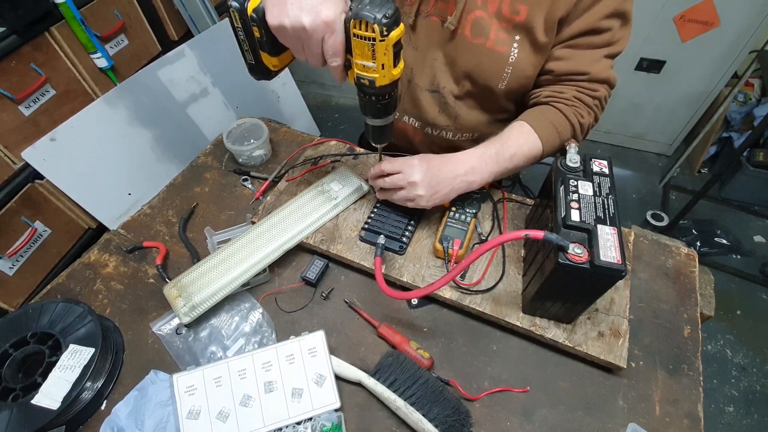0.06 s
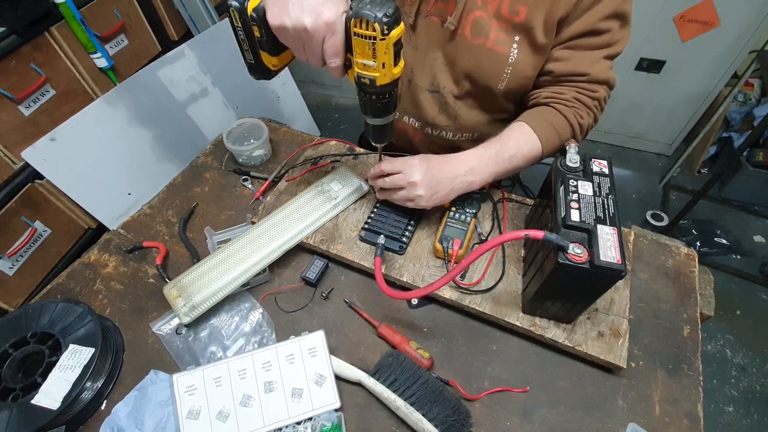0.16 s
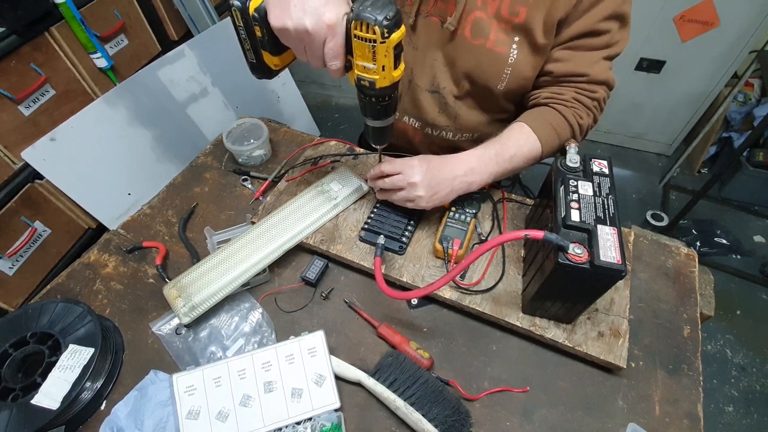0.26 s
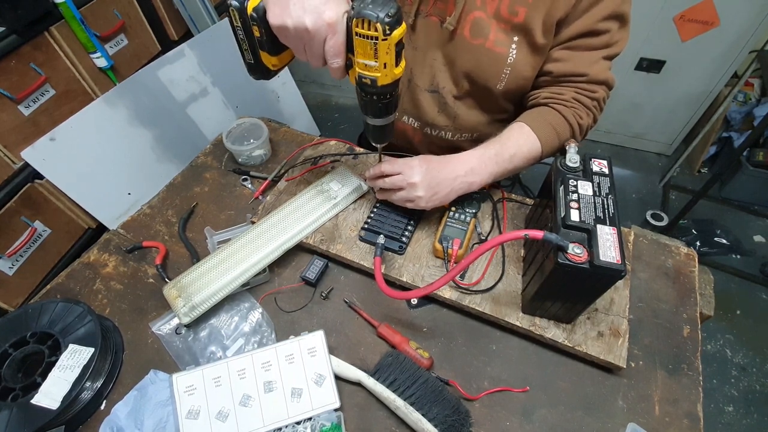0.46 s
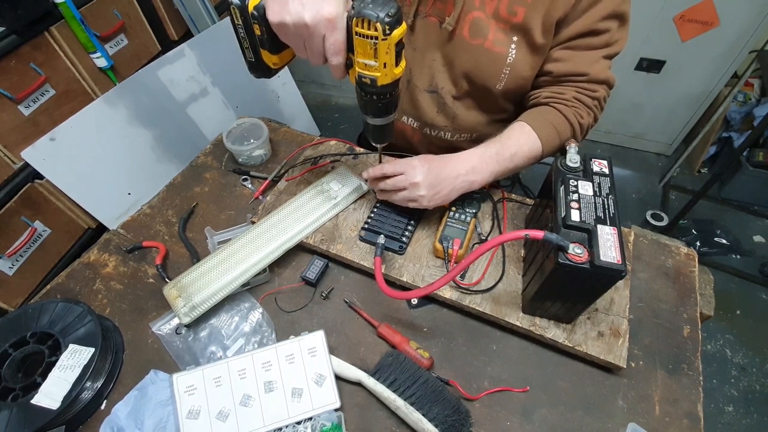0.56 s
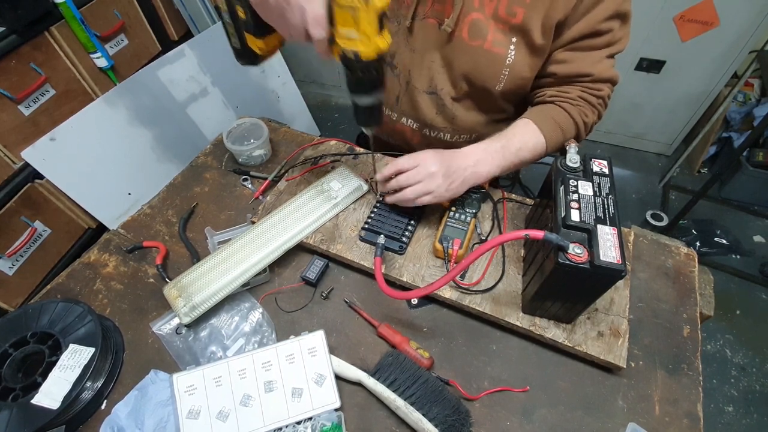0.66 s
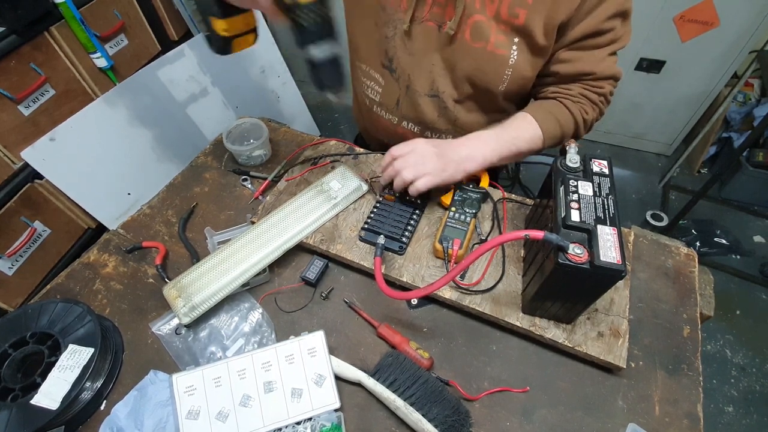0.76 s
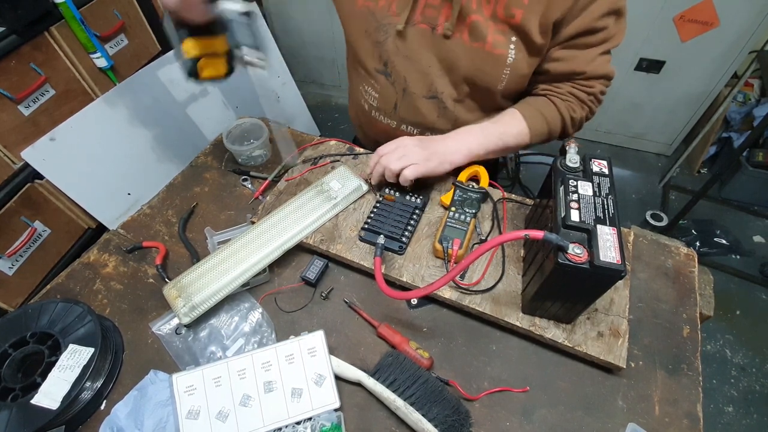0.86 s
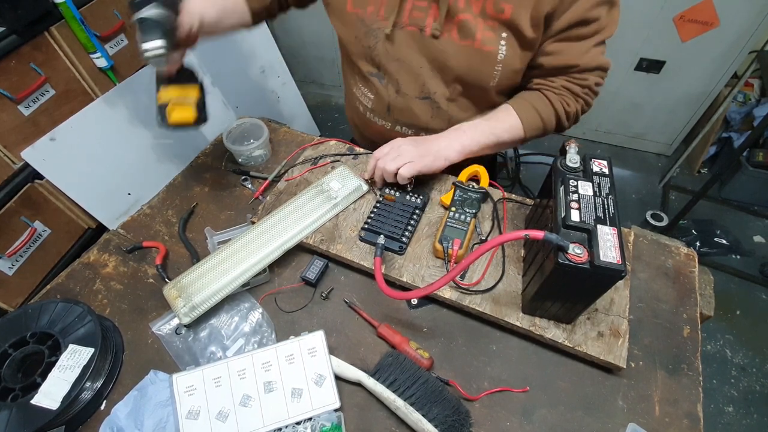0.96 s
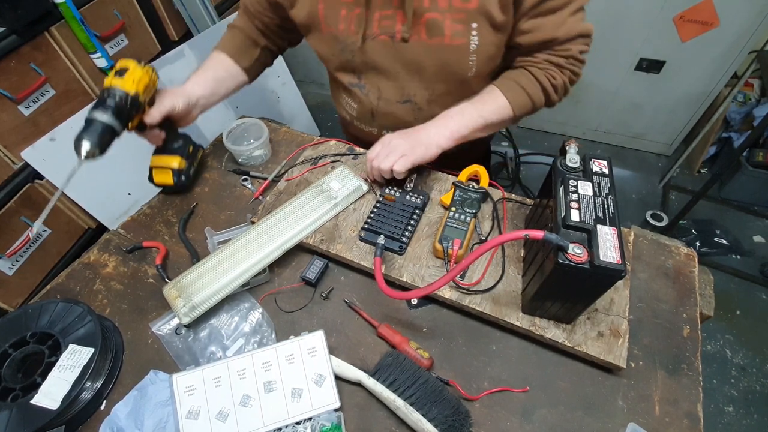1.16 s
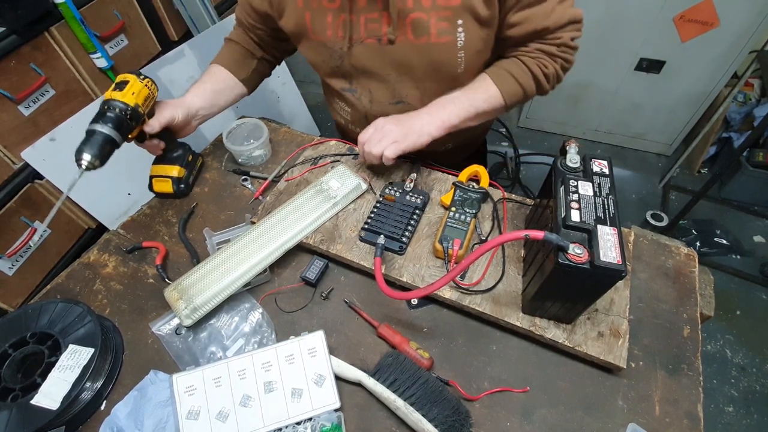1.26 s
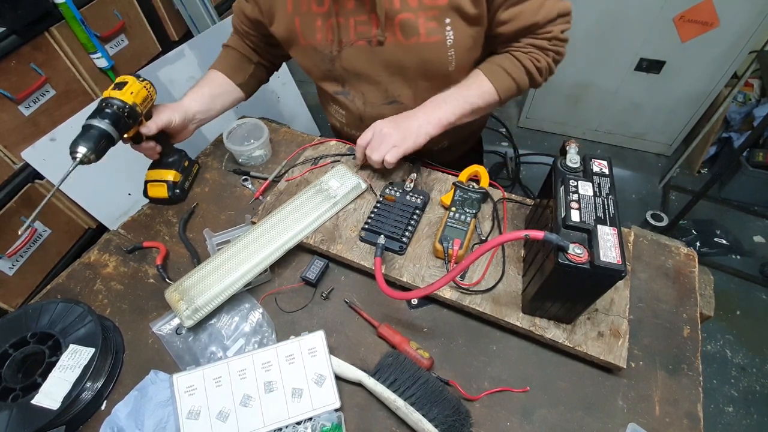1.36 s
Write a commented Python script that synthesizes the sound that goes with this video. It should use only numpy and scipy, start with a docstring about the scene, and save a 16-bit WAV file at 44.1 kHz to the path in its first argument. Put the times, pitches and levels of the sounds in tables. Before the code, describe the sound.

A cordless drill runs in one brief burst, driving a screw, with a few knocks.

```python
"""A small workshop, where a cordless drill drives a screw into a board on a workbench.
The bit knocks into place; the motor runs for a fifth of a second, its gear teeth exciting the housing.
The bit jumps in the screw head, the drive stops with a clack, and one more knock follows.
Each blow sets the bench's low modes ringing. Plastic ticks and a sleeve rustles as the drill is
lifted away. All of it reaches the listener directly, by early reflections and as reverberation."""
import sys
import numpy as np
from scipy import signal
from scipy.fft import rfft, irfft, next_fast_len
from scipy.io import wavfile
from scipy.ndimage import map_coordinates

SR = 44100
rng = np.random.default_rng(int(sys.argv[2]) if len(sys.argv) > 2 else 0)


def master_out(mix):
    """Clip the mix to full scale and print it as 16-bit PCM to the path in sys.argv[1]."""
    frames = np.transpose(np.atleast_2d(mix))
    ceiling = np.clip(frames, -1, 1)
    pcm = np.round(ceiling * 32767).astype(np.int16)
    wavfile.write(sys.argv[1], SR, pcm)


N = 61739

# Levels and gains in the tables are relative.
# Motor shaft rotation: time_s, speed_hz
SHAFT_SPEED = [(.385, 229.7), (.408, 305.2), (.44, 318.2), (.475, 326.4), (.51, 348.8), (.545, 356),
               (.57, 368), (.6, 361.3), (.65, 278.4)]
# Loudness of the gears under load: time_s, level_db
GEAR_LOAD = [(.385, -77), (.394, -58), (.406, -37.5), (.43, -27), (.465, -23), (.555, -24), (.58, -26.5),
             (.59, -31), (.604, -24), (.618, -50.5), (.66, -78.5)]
# Response of gearbox and housing: frequency_hz, gain_db
HOUSING_RESPONSE = [(60, -13.5), (200, -18), (600, -18), (1200, -13.5), (1900, -11), (2500, -4.5),
                    (3100, -4.5), (4200, -5), (5900, -6.5), (7800, -13), (9500, -8.5), (11500, -15.5),
                    (15000, -18.5)]
# Motor harmonics: shaft_multiple, level_db
WHINE_HARMONICS = [(4, -23), (8, -16), (9, -8), (10, -17), (18, -23), (27, -21)]
# Blows of bit and drill on the work:
# start_s, thump_db, low_db, body_db, mid_db, high_db, treble_db, clatter_t60_s
BLOWS = [(.001, -35, -18, -13.5, -24.5, -38, -56.5, 0.086), (.028, -33, -17, -10.5, -18, -30, -52, 0.052),
         (.227, -67, -27, -13.5, -20, -23.5, -38.5, .05), (.233, -22.5, -13.5, -11, -19, -36, -48, 0.28),
         (.395, -80, -43, -33, -22, -34, -45.5, .02), (.428, -18, 6, -0.5, -12, -8.5, -27.5, 0.093),
         (.445, -28.5, -2, -6, -14, -12.5, -26, 0.046), (.565, -43.5, -16.5, -8.5, -5.5, -5, -16.5, 0.079),
         (.596, -37.5, -6, 2, -5, -6, -17, 0.027), (.766, -37, -14, -12, -8.5, -16.5, -30.5, 0.031)]
# Where a blow's five levels, low to treble, apply: frequency_hz
BLOW_BANDS = [300, 550, 1200, 3000, 9000]
# Modes of bench and board: pitch_hz, level_db, t60_s
BENCH_MODES = [(49, -7.5, .36), (66.2, -10, 0.27), (77.8, -4, 0.16), (94.5, -5, 0.13), (140.7, -3, 0.13),
               (229, -11, 0.14), (321.8, -14, 0.14)]
# Soft leaning on the bench: start_s, level_db
BENCH_NUDGES = [(0.185, -36.5), (0.789, -45.5), (1.335, -47), (1.373, -39.5)]
# Spectrum of the bench shaken by the turning bit: frequency_hz, gain_db
HUM_SPECTRUM = [(30, -14), (58, -2), (100, -5), (140, 6), (230, -4), (330, -12), (450, -18), (1000, -45)]
# Light contacts on the lifted drill: start_s, level_db, ring_db, treble_db, t60_s
SHELL_CONTACTS = [(.943, -55.5, -71, 1.5, 0.023), (1.014, -65.5, -56.5, -4, 0.018),
                  (1.09, -60, -57.5, -18, .015), (1.133, -55, -55, -22.5, .07), (1.248, -44, -48, 3, 0.071),
                  (1.294, -48.5, -54, -10, .05), (1.341, -40.5, -67, 3, 0.049),
                  (1.357, -50.5, -76, 11.5, 0.055), (1.391, -34, -48, -7, 0.033)]
# Spectrum of a contact below its treble: frequency_hz, gain_db
TICK_SPECTRUM = [(100, -12), (400, -7), (750, 2), (2000, -3), (3500, 2)]
# Modes of the drill's shell: pitch_hz, level_db, t60_s
SHELL_MODES = [(752, -19, 0.041), (1206, 0, 0.035), (2660, -17.5, .04), (3500, 0.5, 0.022)]
# Thin, fuzzy ring of the moving drill: time_s, pitch_hz, level_db
SHIMMER_PATH = [(1.005, 1190, -98), (1.017, 1210, -64), (1.05, 1230, -79.5), (1.14, 1290, -65),
                (1.169, 1300, -72.5), (1.249, 1370, -69.5), (1.4, 1400, -73.5)]
# Rubbing of sleeve and hand: time_s, level_db
RUSTLE_ENVELOPE = [(0, -101), (.215, -87), (.245, -50.5), (.29, -62), (.35, -66.5), (.385, -68.5),
                   (.87, -76.5), (1.0, -69), (1.15, -72), (1.22, -75), (1.32, -61.5), (1.4, -57)]
# Spectrum of that rubbing: frequency_hz, gain_db
CLOTH_SPECTRUM = [(60, -7), (300, -13.5), (750, -2), (950, -10), (1350, -3.5), (1900, -6), (3300, -3),
                  (6000, -18), (8500, -19), (15000, -28.5)]
# Response of the straight path: frequency_hz, gain_db
DIRECT_RESPONSE = [(100, -1), (1200, 2), (3000, -0.5), (9000, -9)]
# Response of the echoes off the cluttered bench: frequency_hz, gain_db
EARLY_RESPONSE = [(60, -43), (250, -5.5), (1000, -2.5), (3000, -1.5), (10000, 0)]
# Reverberation time of the workshop: frequency_hz, t60_s
ROOM_DECAY = [(100, 0.4745), (500, 0.29), (1500, 0.27), (3000, 0.44), (6000, 0.2877), (12000, 0.19)]
# Response of the reverberant tail: frequency_hz, gain_db
TAIL_RESPONSE = [(50, -11.5), (150, -8), (300, -7), (500, -2.5), (1000, -5), (1700, -3.5), (3200, -10),
                 (6000, -8), (12000, -6)]
# Stereo balance: frequency_hz, left_over_right_db
BALANCE = [(100, 0), (600, 1.5), (1300, 1.5), (2400, 1.5), (4400, 4.5), (8000, 2.5), (14000, -0.5)]
# Width of the diffuse field: frequency_hz, side_over_mid_db
FIELD_WIDTH = [(80, -17), (200, -12.5), (450, -8), (1200, 0)]
# Spectrum of the quiet air: frequency_hz, gain_db
AIR_SPECTRUM = [(20, -16.5), (70, 2.5), (150, -13.5), (500, -8), (1500, -22.5), (4000, -27.5), (8000, -44),
                (15000, -49.5)]


def drill(pulses_per_turn=9, carrier_ratio=.26, speed_jitter=.004, flutter_db=3, wander_rad=.9):
    """Forced vibration: sharp pulses nine times a shaft turn and gear and brush friction drive the housing; the
    motor whines."""
    turns = np.cumsum(curve(SHAFT_SPEED) * (1 + speed_jitter * wobble(150))) / SR
    angle = 2 * np.pi * turns
    strikes = np.diff(np.floor(pulses_per_turn * turns), prepend=0)
    strikes *= 1 + 1.98 * rng.standard_normal(N)  # the pulses come unevenly
    # Gear noise swells with the planet carrier and twice a shaft turn.
    swell = (1 + .36 * np.sin(carrier_ratio * angle)) * (1 + .13 * np.sin(2 * angle))
    mesh = amp(-7.5) * swell * unit(coloured(strikes - strikes.mean(), HOUSING_RESPONSE))
    grind = amp(-1.5) * swell * noise(HOUSING_RESPONSE)
    whine = np.zeros(N)
    for multiple, db in WHINE_HARMONICS:
        strength = amp(db + flutter_db * wobble(200))
        whine += strength * np.sin(multiple * angle + wander_rad * wobble(120))
    return amp(curve(GEAR_LOAD)) * np.array([mesh, grind, whine])


def motor_squeal(start_s=.3895, pitch_hz=3950, level_db=-41, t60_s=.12):
    """Starting transient: one damped tone as the trigger first feeds the motor."""
    out = np.zeros(N)
    add(out, start_s, ring([(pitch_hz, level_db, t60_s)]))
    return out


def knocks(crack_t60_s=.004, clatter_db=5.5):
    """Impact excitation: each brief contact gives a broadband crack and a short clatter."""
    out = np.zeros(N)
    for start_s, _, *bands_db, t60_s in BLOWS:
        spectrum = [(60, bands_db[0] - 6), *zip(BLOW_BANDS, bands_db), (15000, bands_db[-1] - 10)]
        crack = .72 * signal.unit_impulse(N) + .7 * burst(crack_t60_s)
        clatter = amp(clatter_db) * burst(t60_s)
        add(out, start_s, amp(8.5) * coloured(crack + clatter, spectrum))
    return out


def bit_slip(start_s=.5646, level_db=-10.5, pitch_hz=1160, rise_s=.00064):
    """Heavy damping: the board gives one hard pop as the bit jumps in the screw head."""
    out, t = np.zeros(N), np.arange(N) / SR
    envelope = (t / rise_s * np.exp(1 - t / rise_s)) ** 2
    add(out, start_s, amp(level_db) * envelope * np.sin(2 * np.pi * pitch_hz * t))
    return out


def bench(blow_rise_s=.0021, nudge_rise_s=.012, hum_db=-16.5):
    """Free and forced vibration: the bench rings after blows and nudges, and hums as the bit turns."""
    out, t = np.zeros(N), np.arange(N) / SR
    for events, rise_s in (BLOWS, blow_rise_s), (BENCH_NUDGES, nudge_rise_s):
        for start_s, db, *_ in events:
            add(out, start_s, amp(db) * ring(BENCH_MODES) * (1 - np.exp(-t / rise_s)))
    hum = amp(curve(GEAR_LOAD) + hum_db) * noise(HUM_SPECTRUM)
    return out + hum


def ticks(click_gain_db=20.5):
    """Modal resonance: light plastic contacts click and ring the drill's shell."""
    out = np.zeros(N)
    for start_s, db, ring_db, treble_db, t60_s in SHELL_CONTACTS:
        spectrum = [*TICK_SPECTRUM, (6500, treble_db), (15000, treble_db - 23.5)]
        click = amp(db + click_gain_db) * coloured(burst(t60_s), spectrum)
        add(out, start_s, click + amp(ring_db) * ring(SHELL_MODES))
    return out


def shimmer(modulation_hz=150):
    """Random modulation: a tone spreads into a narrow band, rising as the drill swings away."""
    time_s, pitch_hz, db = np.transpose(SHIMMER_PATH)
    phase = 2 * np.pi * np.cumsum(curve(np.c_[time_s, pitch_hz])) / SR
    band = wobble(modulation_hz) * np.cos(phase) + wobble(modulation_hz) * np.sin(phase)
    return amp(curve(np.c_[time_s, db])) * band


def rustle(flutter_db=3.5):
    """Friction noise: sleeve and hand brush along unevenly."""
    return amp(curve(RUSTLE_ENVELOPE) + flutter_db * wobble(90)) * noise(CLOTH_SPECTRUM)


def workshop(source, early_db, tail_db, early_t60_s=.049, left_lead_s=.00005):
    """Multipath propagation: direct sound from slightly left, bench echoes and a reverberant tail."""
    hz, t, spectrogram = signal.stft(diffuse(), SR, nperseg=256)
    decay = np.exp(-np.log(1000) * t / along(ROOM_DECAY, hz)[:, None])
    tail = signal.istft(spectrogram * decay, SR, nperseg=256)[1][:, :N]
    tail *= 1 - fade(.022)  # reverberation takes a moment to build
    tail = amp(tail_db) * coloured(tail / np.linalg.norm(tail[0]), TAIL_RESPONSE)
    early = diffuse() * fade(early_t60_s)
    early = amp(early_db) * coloured(early / np.linalg.norm(early[0]), EARLY_RESPONSE)
    side = np.array([[.5], [-.5]])
    lead_s = side * left_lead_s
    direct = filtered(source, lambda f: amp(along(DIRECT_RESPONSE, f)) * np.exp(2j * np.pi * f * lead_s))
    reflected = signal.fftconvolve(source[None], early + tail, axes=1)[:, :N]
    return filtered(direct + reflected, lambda f: amp(side * along(BALANCE, f)))


def room_air(level_db=-79):
    """Ambient noise: a steady diffuse field, strongest in the bass."""
    return amp(level_db) * unit(coloured(diffuse(), AIR_SPECTRUM))


def diffuse():
    """Spatial coherence: stereo noise, alike in the bass and unrelated in the treble."""
    def mid_side_gains(hz):
        width = amp(along(FIELD_WIDTH, hz))
        return np.array([np.ones_like(hz), width]) / np.hypot(1, width)
    mid, side = filtered(rng.standard_normal((2, N)), mid_side_gains)
    return np.array([mid + side, mid - side])


def ring(modes):
    """Modal sum: damped sines whose strengths vary a little from blow to blow."""
    t = np.arange(N) / SR
    return sum(amp(db + rng.normal()) * fade(t60) * np.sin(2 * np.pi * hz * t) for hz, db, t60 in modes)


def burst(t60_s):
    """Noise transient of unit energy."""
    x = rng.standard_normal(N) * fade(t60_s)
    return x / np.linalg.norm(x)


def fade(t60_s):
    """Exponential decay by 60 dB in t60_s."""
    return np.exp(-np.log(1000) * np.arange(N) / SR / t60_s)


def noise(spectrum):
    """Spectrally shaped noise of unit rms."""
    return unit(coloured(rng.standard_normal(N), spectrum))


def coloured(x, points):
    """Minimum-phase filtering through points of frequency_hz, gain_db."""
    size = 2 * next_fast_len(N)
    gain = amp(along(points, np.fft.rfftfreq(size, 1 / SR)))
    cepstrum = irfft(np.log(gain))
    cepstrum[1:size // 2] *= 2  # folding onto positive time makes the filter causal
    cepstrum[size // 2 + 1:] = 0
    return irfft(rfft(x, size) * np.exp(rfft(cepstrum)), size)[..., :N]


def filtered(x, response):
    """Linear filtering by a complex frequency response."""
    size = next_fast_len(2 * N)
    return irfft(rfft(x, size) * response(np.fft.rfftfreq(size, 1 / SR)), size)[..., :N]


def wobble(rate_hz):
    """Smooth random variation with rate_hz knots a second."""
    return map_coordinates(rng.standard_normal(N), [np.arange(N) * rate_hz / SR])


def curve(points):
    """Linear interpolation in time, one value per sample."""
    return np.interp(np.arange(N) / SR, *np.transpose(points))


def along(points, hz):
    """Interpolation on a logarithmic frequency axis."""
    knots_hz, values = np.transpose(points)
    return np.interp(np.log(hz + 1), np.log(knots_hz + 1), values)


def amp(db):
    """Amplitude ratio from decibels."""
    return 10 ** (np.asarray(db) / 20)


def unit(x):
    """Normalisation to unit rms."""
    return x / np.sqrt(np.mean(x ** 2) + 1e-20)


def add(track, start_s, sound):
    """Superposition of a sound on a track from start_s."""
    i = max(round(start_s * SR), 0)
    track[i:] += sound[:N - i]


def scene():
    """Superposition: each source arrives by its own paths, over the quiet air of the workshop."""
    mesh, grind, whine = drill()
    mix = workshop(mesh, early_db=2.5, tail_db=1)
    mix += workshop(grind, early_db=-.5, tail_db=-1)
    mix += workshop(whine + motor_squeal(), early_db=-6, tail_db=-5.5)
    mix += workshop(knocks() + bit_slip(), early_db=-1.5, tail_db=-1.5)
    mix += workshop(bench(), early_db=-2, tail_db=0)
    mix += workshop(ticks() + shimmer(), early_db=-4, tail_db=-3.5)
    mix += workshop(rustle(), early_db=2, tail_db=-2.5)
    return mix + room_air()


def record(dry):
    """Band limiting: the deepest bass rolls off and the highest treble is cut steeply."""
    low_hz, top_hz = 35, 15400
    thin = signal.sosfilt(signal.butter(2, low_hz, "highpass", fs=SR, output="sos"), dry)
    return filtered(thin, lambda hz: 1 / np.sqrt(1 + (hz / top_hz) ** 300))


dry = scene()
out = record(dry)
master_out(out)
```